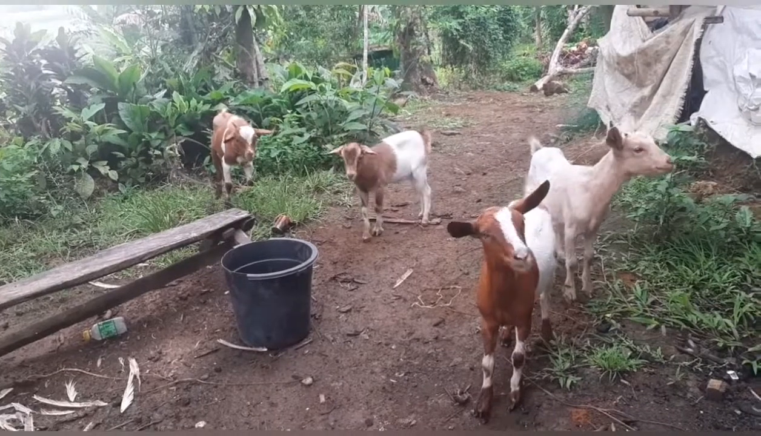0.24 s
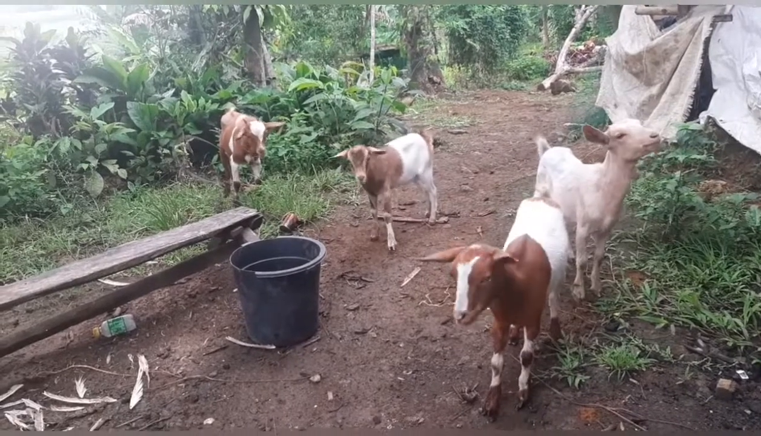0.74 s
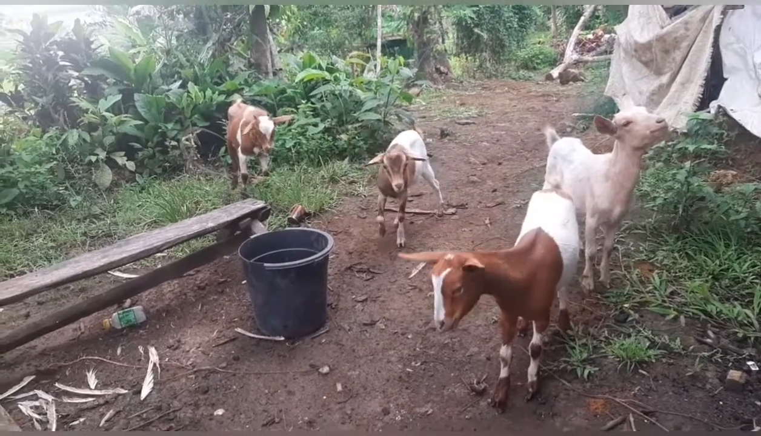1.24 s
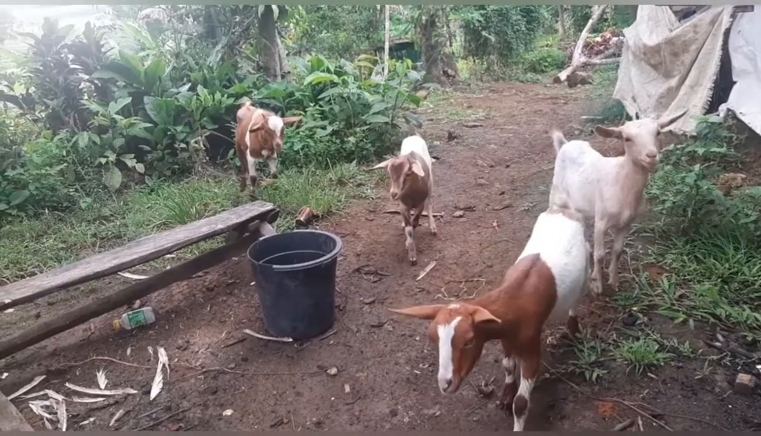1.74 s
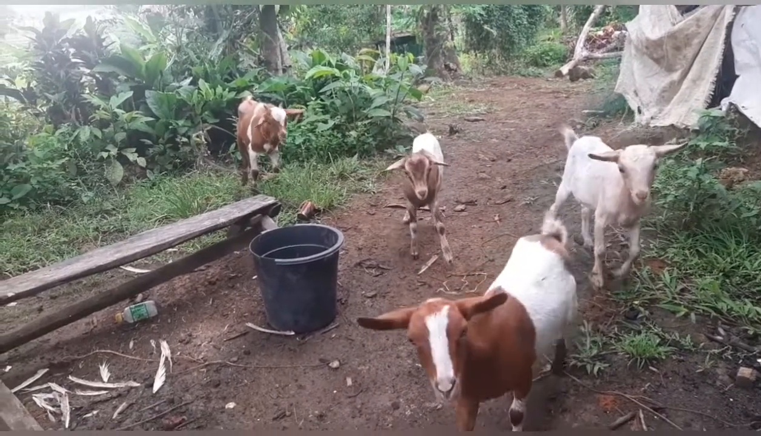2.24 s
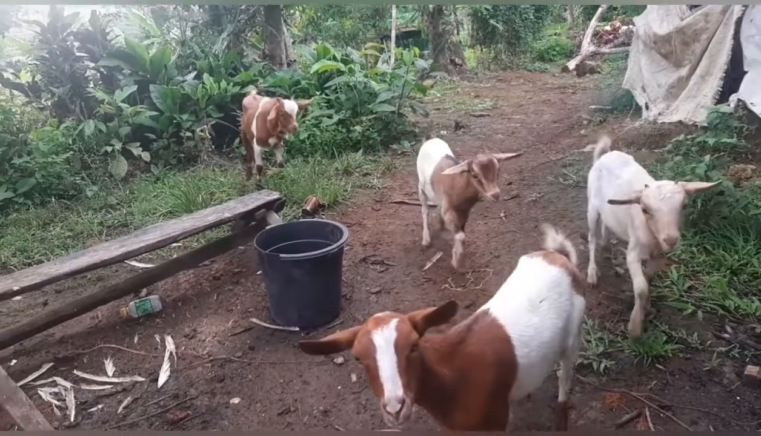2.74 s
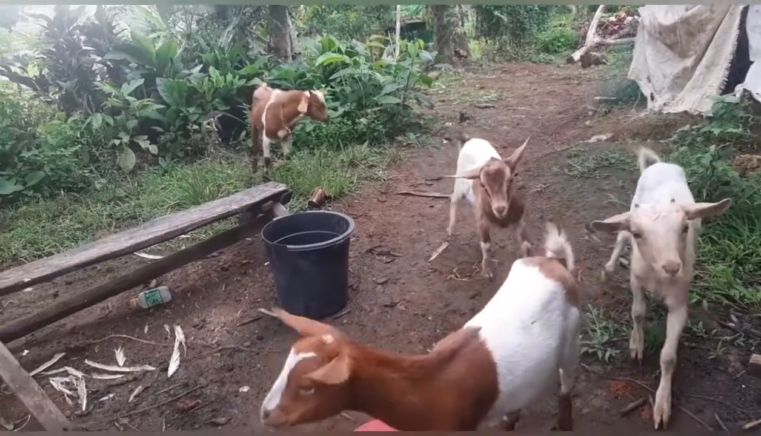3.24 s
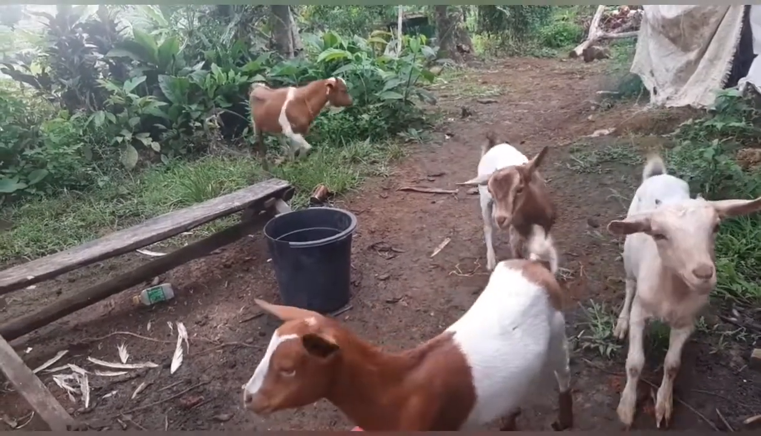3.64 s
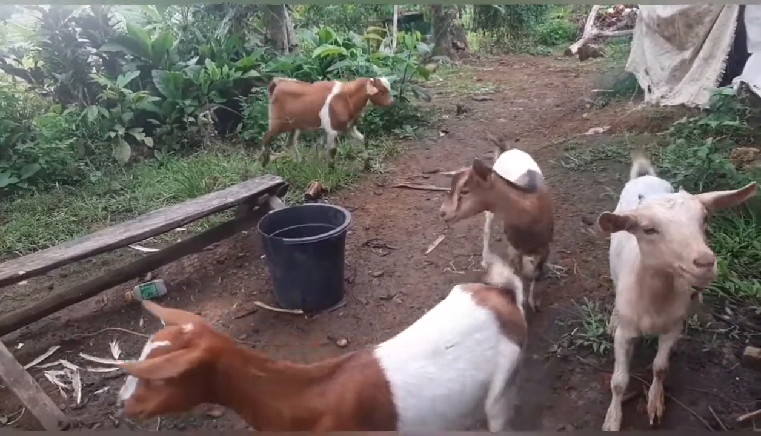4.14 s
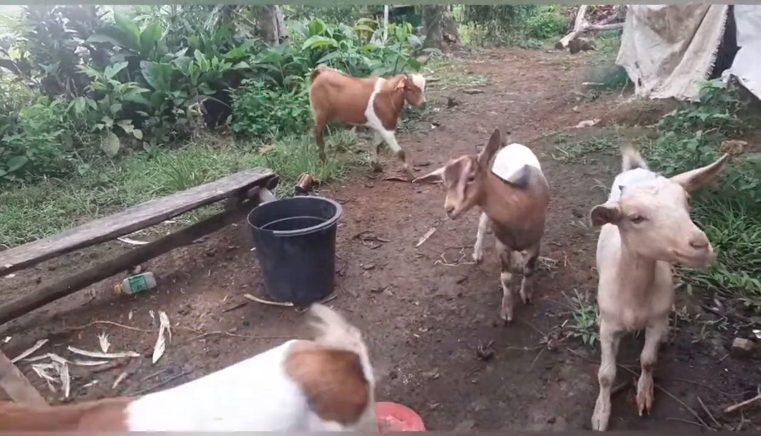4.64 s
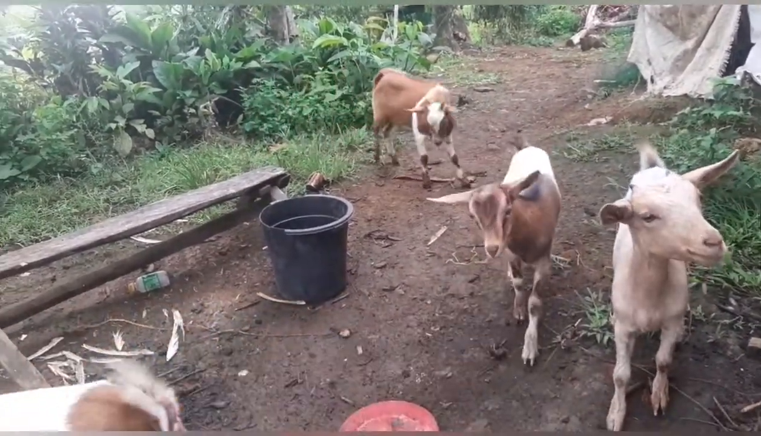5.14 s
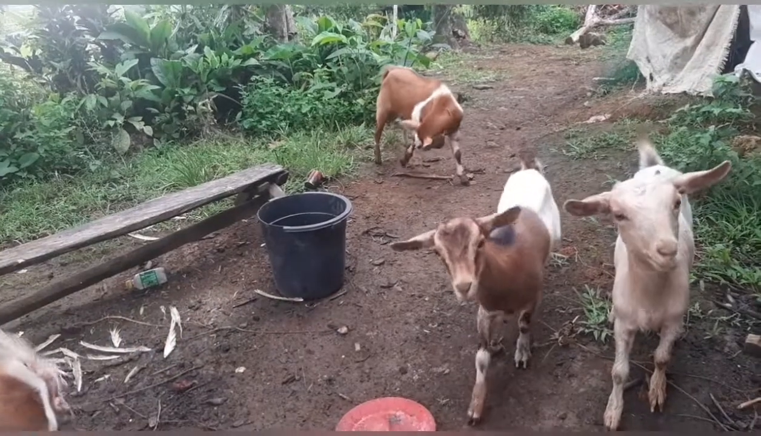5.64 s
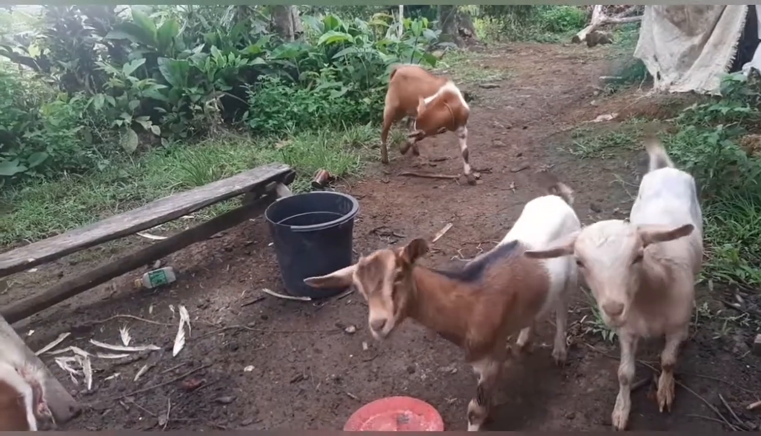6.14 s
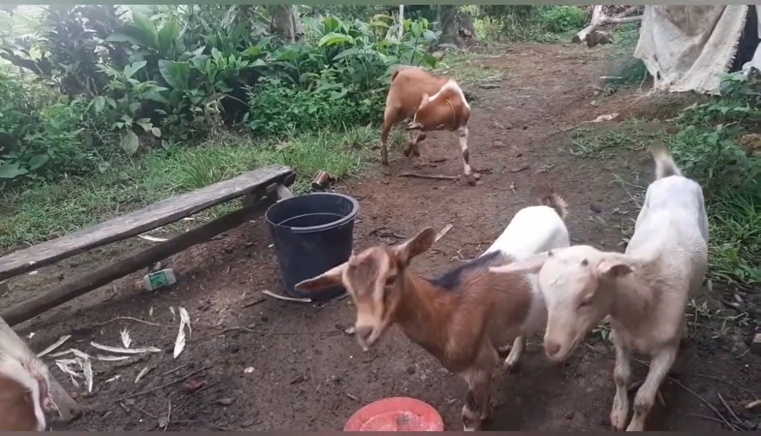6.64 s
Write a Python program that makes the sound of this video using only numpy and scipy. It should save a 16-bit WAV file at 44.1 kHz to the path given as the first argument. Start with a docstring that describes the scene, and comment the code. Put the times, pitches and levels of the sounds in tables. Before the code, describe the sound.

In a quiet dirt yard, one kid goat bleats nasally at the start, another hoarsely later, among light hoof scuffs, distant clucking and insect buzz.

```python
"""A dirt yard beside dense greenery, where goat kids wander. Two bleat in turn, close by: high, quavering
calls, nasal, then open, then hoarse, made of pitch harmonics and breath noise shaped by throat resonances.
Hoof steps are noise bursts (thud, scrape, grit); clucks, chirrs and far calls are gliding sine tones.
Filtered noise makes a faint insect hiss and buzz, a low rumble and a patchy background of narrow bands."""
import sys
import numpy as np
from scipy import signal
from scipy.fft import rfft, irfft, next_fast_len
from scipy.io import wavfile
from scipy.ndimage import uniform_filter1d

SR = 44100
rng = np.random.default_rng(int(sys.argv[2]) if len(sys.argv) > 2 else 0)


def generate_wav(sig):
    """Save sig (samples, or channels by samples) to the path in sys.argv[1] as 16-bit PCM at SR."""
    pcm = np.round(np.clip(np.atleast_2d(sig).T, -1, 1) * 32767).astype(np.int16)
    wavfile.write(sys.argv[1], SR, pcm)


N = 304102
TIME = np.arange(N) / SR
PADDED = next_fast_len(N + 2000, True)
FREQS = np.maximum(np.arange(PADDED // 2 + 1) * SR / PADDED, 1)
CUTOFF_HZ = 15600

# background level before each layer's trim: segments of rows [t/s, rumble level/dB, hiss level/dB]
YARD_AIR = [
    [(0.72, -60.5, -54), (1.1, -60.5, -56), (2.9, -65.5, -55.5), (3.33, -57.5, -55), (4.25, -65, -56)],
    [(5.05, -65, -58), (5.412, -66, -58.5), (5.562, -67, -59), (6.736, -59.5, -55.5), (6.89, -62.5, -56)],
]
# the yard at the two microphone ports: [f/Hz, left-right level/dB, likeness 0-1]
YARD_PATH = [(100, 5.5, 0.91), (344, -3.5, 1), (710, 4.5, 0), (1500, -5, 0), (2220, -11.5, 0.4),
             (3100, -1, 0), (5500, -5, 0.3), (6940, -2, 0), (9000, 1.5, 0.68), (15000, 0.5, 0)]
PORT_LAG_RAD = 2 * np.pi * FREQS * 0.0004794   # a path difference of 0.4794 ms


def from_db(db):
    """Logarithmic level: decibels to amplitude gain."""
    return 10 ** (np.asarray(db) / 20)


def rms_one(x):
    """Normalisation: scale to unit mean power."""
    return x / np.sqrt(np.mean(x ** 2) + 1e-20)


def in_time(rows, t):
    """Linear interpolation: each column of a curve at times t."""
    s, *columns = np.transpose(rows)
    return [np.interp(t, s, c) for c in columns]


def at_hz(rows, hz):
    """Interpolation on a log frequency axis: each column of a spectrum at the given frequencies."""
    f, *columns = np.transpose(rows)
    return [np.interp(np.log(hz), np.log(f), c) for c in columns]


def wander(rate_hz, size):
    """Low-passed noise: a smooth random modulation with unit rms."""
    sos = signal.butter(2, rate_hz, fs=SR / 10, output="sos")
    slow = signal.sosfilt(sos, rng.standard_normal(size // 10 + 2002))[2000:]   # skip the filter's start
    return np.interp(np.arange(size) / 10, np.arange(len(slow)), rms_one(slow))


def at_ports(spectrum, balance_db, lead_rad, apart=0):
    """Interaural-style cues: a spectrum to stereo by level and phase differences, total power kept."""
    ratio = from_db(balance_db)
    left = (spectrum + apart) * ratio
    right = (spectrum - apart) * np.exp(-1j * lead_rad)
    return irfft(np.array([left, right]) * np.sqrt(2 / (1 + ratio ** 2)), PADDED)[:, :N]


def from_yard(x):
    """Time difference of arrival: a small yard sound reaches the left port first."""
    return at_ports(rfft(x, PADDED), at_hz(YARD_PATH, FREQS)[0], PORT_LAG_RAD)


def yard_noise(spectrum):
    """Partial coherence: coloured stereo noise whose likeness at the ports depends on frequency; rms 1."""
    balance_db, alike = at_hz(YARD_PATH, FREQS)
    alike = np.clip(alike, 0, 1)
    common, apart = rfft(rng.standard_normal((2, PADDED))) * from_db(at_hz(spectrum, FREQS)[0])
    common, apart = common * np.sqrt(1 + alike), apart * np.sqrt(1 - alike)
    return rms_one(at_ports(common, balance_db, PORT_LAG_RAD, apart))


def first_kid():
    """Source and filter: the first kid's fold pushes and throat resonances."""
    # the arch beneath the throbs: [t/s, f/Hz, relative level/dB, mouth opening 0-1]
    arch = [(.135, 264.3, -50, 0.6), (.212, 299.5, -45, 0.22), (.238, 415, -43, 0.52),
            (.315, 445, -30.5, .29), (.378, 444.5, -30, 0.54), (.41, 457.7, -32, 0.03),
            (.475, 447, -25, 0.68), (.51, 447, -26.5, 0.63), (.565, 423.3, -26.5, 0.72),
            (.642, 336.8, -35, 0.68)]
    # throbs of the quaver: [t/s, rise/s, fall/s, level lift/dB, pitch lift/Hz]
    throbs = [(0.176, 0.023, 0.021, 9.5, 38.7), (0.278, 0.025, 0.017, 7.5, 5.2),
              (.362, 0.04, 0.021, 3.5, 17.8), (0.46, 0.01314, 0.0092, 4, 19),
              (0.556, 0.027, 0.0113, 10, 8.1)]
    # throat and mouth response: [f/Hz, closed level/dB, half open level/dB, wide open level/dB]
    throat = [(450, 7.5, -4, -25.5), (873, -7.5, -3.5, 13.5), (1390, -22, -3, -15.5), (1660, -19, -8, -25),
              (2210, -11, -2.5, 3.5), (2390, -13, -2.5, -42), (3150, -16, -6, -21), (3640, 11.5, -11, -6),
              (4220, -9, -0.5, -23.5), (4900, -13, -2, -25), (6200, -24, -23.5, -25.5),
              (8200, -23, -21, -40), (9800, -30, -31, -61), (13950, -42, -28.5, -38)]
    # path to the two ports: [f/Hz, left-right level/dB, left lead/rad]
    ports = [(450, 1.8, -0.52), (900, 4.5, 0.34), (1350, -8.3, 6.76), (1800, 0.7, 5.3), (2250, -8.7, 7.27),
             (2700, -5.2, 9.93), (3600, -4.5, 10.96), (4050, -4.2, 11.44), (4500, 2.9, 11.12),
             (4950, -6.5, 17.66), (5400, -5.4, 17.18), (7650, -2.2, 23.2), (12600, -5.8, 40.83)]
    return bleat(arch, throbs, throat, ports, gain_db=-1.5, tilt_db=-1.0, full_db=-31.5, dulling=0.3,
                 start_dull_db=5, throb_bright=0.04, jitter=0.026, rasp=0.39, rasp_hz=87,
                 breath_db=-30, uneven_db=4.5, jaw_hz=660, jaw_lift=0.92)


def second_kid():
    """Source and filter: the second kid has its own fold pushes and throat resonances."""
    # the arch beneath the throbs: [t/s, f/Hz, relative level/dB, mouth opening 0-1]
    arch = [(4.441, 280, -40.5, 0.67), (4.487, 379, -39, .02), (4.52, 438.6, -47.5, 0.17),
            (4.605, 460, -39.5, 0.057), (4.655, 486.6, -23.5, .23), (4.682, 477.6, -21, 1),
            (4.715, 482.6, -15, 0.9), (4.77, 472.8, -23, 0.6), (4.85, 462.3, -22.5, .55),
            (4.89, 433, -38.5, 0.6), (4.932, 368.3, -37.5, 0.18)]
    # throbs of the quaver: [t/s, rise/s, fall/s, level lift/dB, pitch lift/Hz]
    throbs = [(4.564, 0.024, 0.017, 17.6, 37), (4.661, 0.048, 0.012, 4.6, 13.8),
              (4.744, 0.0364, 0.0079, 7.5, 18.6), (4.827, 0.026, 0.015, 8.9, 29)]
    # throat and mouth response: [f/Hz, closed level/dB, half open level/dB, wide open level/dB]
    throat = [(467, 11, -17.5, -21), (1040, -10, -2, 5), (1460, -8.5, -4.5, -22.5), (2000, 5, -9, -17),
              (2325, -6.5, -5.5, -0.5), (2880, -26, -8, -18.5), (3500, -12, -18.5, -26.5),
              (3800, -4.5, -2.5, -12.5), (4950, -1, 1, -0.5), (5660, -20, -25.5, -26.5),
              (5810, -21.5, -16, -8), (8580, -25.5, -19.5, -24.5), (9600, -31, -32, -38),
              (14550, -29.5, -34, -35.5)]
    # path to the two ports: [f/Hz, left-right level/dB, left lead/rad]
    ports = [(487, 6.2, 0.48), (974, 2.1, 1.2), (1461, -6.2, 2.59), (1948, -6.5, 3.52), (2435, -4.1, 5.94),
             (2922, 5.6, 9.65), (3896, 2.4, 13.56), (4383, 1.2, 14.85), (4870, -6.1, 16.67),
             (5357, -2.6, 17.6), (5844, -3.0, 19.03), (8279, 3.9, 25.27), (13636, -2.1, 44.67)]
    return bleat(arch, throbs, throat, ports, gain_db=-0.06, tilt_db=0.1, full_db=-34, dulling=0.12,
                 start_dull_db=0.5, throb_bright=0.044, jitter=0.022, rasp=0.76, rasp_hz=100,
                 breath_db=-29, uneven_db=4.0, jaw_hz=655, jaw_lift=10.0)


def bleat(arch, throbs, throat, ports, gain_db, tilt_db, full_db, dulling, start_dull_db, throb_bright,
          jitter, rasp, rasp_hz, breath_db, uneven_db, jaw_hz, jaw_lift):
    """Source-filter voice: folds pushed in throbs give harmonics and breath through an opening throat."""
    attack_s, release_s, edge_db = .012, .025, 31   # the voice swells and dies by edge_db in these times
    start, end = arch[0][0], arch[-1][0]
    span = (TIME >= start - attack_s) & (TIME <= end + release_s)
    t = TIME[span]
    pitch, level_db, mouth = in_time(arch, t)
    mouth = np.clip(mouth, 0, 1)
    outside = np.maximum(start - t, 0) / attack_s + np.maximum(t - end, 0) / release_s
    level_db = level_db - edge_db * outside
    rough = roughness(t, throbs)

    push_db = 0
    for s, rise, fall, lift_db, lift_hz in throbs:   # each push makes the voice louder, higher and brighter
        push = np.exp(-((t - s) / np.where(t < s, rise, fall)) ** 2)
        push_db = push_db + lift_db * push
        pitch = pitch + lift_hz * push
    level_db = level_db + push_db
    weak_db = np.maximum(full_db - level_db, 0)
    pitch = uniform_filter1d(pitch, size=200) * (1 + jitter * rough * wander(110, len(t)))
    phase = 2 * np.pi * np.cumsum(pitch) / SR

    # spectral slope in dB per octave: weak effort is dull, and so is the opening grunt
    slope_db = tilt_db + throb_bright * push_db - dulling * weak_db
    slope_db = slope_db - start_dull_db * np.exp(-((t - t[0]) / .1) ** 2)

    voice, power = 0, 0
    for k in range(1, 41):
        hz = k * pitch
        closed_db, half_db, open_db = at_hz(throat, hz)
        extreme_db = np.where(mouth < .5, closed_db, open_db)
        colour_db = half_db + np.abs(2 * mouth - 1) * (extreme_db - half_db)
        colour_db += slope_db * np.log2(np.clip(hz, 700, 7000) / 1000)
        # a slack jaw lowers the first resonance: weak, open sound gains near jaw_hz
        colour_db += jaw_lift * np.minimum(weak_db, 10) * mouth * np.exp(-((hz - jaw_hz) / 170) ** 2)
        colour_db += uneven_db * min(k / 6, 1) * wander(13.8, len(t))
        gain = from_db(colour_db) * (hz < CUTOFF_HZ)
        scatter = rasp * rough * (hz / 2000) ** 0.95   # upper harmonics blur first
        flutter = (wander(rasp_hz, len(t)) + 1j * wander(rasp_hz, len(t))) * scatter
        ringing = np.exp(-1j * 2.2 * np.sqrt(hz / 100))   # the throat smears each pulse, lows last
        harmonic = np.real((1 + flutter) * ringing * np.exp(1j * k * phase))
        voice = voice + gain * harmonic / np.sqrt(1 + 2 * scatter ** 2)
        power = power + gain ** 2 / 2

    swell = from_db(level_db + gain_db)
    folds, air = np.zeros((2, N))
    folds[span] = swell * voice / np.sqrt(power)
    puffs = 1 + np.cos(phase)   # one puff of air per cycle
    air[span] = swell * np.sqrt(rough) * puffs * rng.standard_normal(len(t))
    air_colour = rms_one(from_db(at_hz(throat, FREQS)[1]) * FREQS / (FREQS + 2500))
    growl = from_db(20) * np.exp(-((FREQS - 280) / 130) ** 2)   # rough folds also flutter below the pitch
    breath = from_db(breath_db) * rfft(air, PADDED) * (air_colour + growl)
    return at_ports(rfft(folds, PADDED) + breath, *at_hz(ports, FREQS))


def roughness(t, throbs):
    """Irregular fold vibration, 0-1: unsteady at the start, rattling after each push, hoarse at the end."""
    clear, onset, onset_s = 0.019, 0.55, .1   # the folds take a while to settle
    rattle, rattle_lag = .25, 1.55   # they rattle this many fall times after a push's peak
    hoarse, hoarse_s = 0.69, 0.049   # and turn hoarse after the last push
    rough = clear + onset * np.exp(-(t - t[0]) / onset_s)
    for s, _, fall, _, _ in throbs:
        rough = rough + rattle * np.exp(-((t - s) / fall - rattle_lag) ** 2)
    since_last = np.maximum(t - throbs[-1][0], 0)
    return np.clip(rough + hoarse * (1 - np.exp(-since_last / hoarse_s)), 0, 1)


def hollow(x):
    """Sympathetic resonance: something hollow in the yard sings on after the voice has swept through."""
    # its modes: [f/Hz, decay time to -60 dB/s, level/dB]
    modes = [(856, .8, -13), (1000, .6, -37.5)]
    out = 0
    for hz, t60, level_db in modes:
        r = 10 ** (-3 / (t60 * SR))   # pole radius
        zeros = [(1 - r * r) / 2, 0, (r * r - 1) / 2]
        poles = [1, -2 * r * np.cos(2 * np.pi * hz / SR), r * r]
        out = out + from_db(level_db) * signal.lfilter(zeros, poles, x)
    return out


def yard_echo(x, wet_db, t60, gap_s):
    """Diffuse scattering: walls, ground and leaves return a short, thin, exponentially decaying tail."""
    t = TIME[:SR // 2]
    tail = rng.standard_normal((2, len(t))) * from_db(-60 * t / t60) * (t > gap_s)
    tail = signal.sosfilt(signal.butter(1, [500, 7000], "band", fs=SR, output="sos"), tail)
    tail = tail / np.sqrt(np.sum(tail ** 2) / 2)
    return from_db(wet_db) * signal.fftconvolve(x, tail, axes=1)[:, :N]


def hooves(thud_db, scrape_db, grit_db, attack_s, grain_db, width):
    """Impact and friction noise: each step is a dull thud, a grainy pitched scrape and a spray of grit."""
    # thud spectrum: [f/Hz, relative level/dB]
    thud_spectrum = [(30, -38), (80, -35), (160, 7), (230, -18), (310, 12.5), (400, -27), (600, -17.5),
                     (1500, -39.5)]
    # grit spectrum: [f/Hz, relative level/dB]
    grit_spectrum = [(1500, -49), (3000, 1), (3900, 1), (4800, 8.5), (5600, -8), (6500, -34), (8000, -1.5),
                     (15000, -31)]
    thud, grit, scrape = np.zeros((3, N))
    for s, spray_db, weight_db, rub_db, hz in footfalls():
        length = 0.046 * 2 ** ((weight_db + 48) / 15.5)   # seconds; heavier steps last longer
        at = slice(int(s * SR), int(s * SR) + SR // 3)
        age = np.maximum(TIME[at] - s, 0)
        press = (1 - np.exp(-age / attack_s)) * np.exp(-(age / length) ** 2.17)
        grains = press * rms_one(from_db(grain_db * wander(176, len(age))))
        band = signal.butter(1, [hz / (1 + width), hz * (1 + width)], "band", fs=SR, output="sos")
        rub = signal.sosfilt(band, grains * rng.standard_normal(len(age)))
        scrape[at] += from_db(rub_db) * rub * np.sqrt(SR / (2 * np.pi * width * hz))   # offsets band loss
        thud[at] += from_db(weight_db) * press
        grit[at] += from_db(spray_db) * grains
    thuds = from_db(thud_db) * thud * yard_noise(thud_spectrum)
    scrapes = from_db(scrape_db) * from_yard(scrape)
    return thuds + scrapes + from_db(grit_db) * grit * yard_noise(grit_spectrum)


def footfalls():
    """Random event process: light shuffles at chance times join the clear steps, in rows like theirs."""
    # the clear steps, levels before trim: [t/s, grit level/dB, thud level/dB, scrape level/dB, scrape f/Hz]
    steps = [(1.0675, -40, -44, -60, 2360), (1.1854, -41, -56, -71, 2480), (1.2794, -62, -50, -48, 1500),
             (1.5194, -51, -43.5, -54, 1610), (1.6157, -44.5, -46.5, -54.5, 2270),
             (1.8844, -51, -40, -52, 1540), (2.0448, -46.5, -48, -46, 1100),
             (2.3884, -47, -49.5, -58, 2420), (2.4304, -47, -48.5, -48, 1530),
             (2.804, -40.5, -61.5, -56, 1610), (2.9472, -46, -46, -62, 2310),
             (3.0994, -40.5, -59, -52.5, 1580), (3.1864, -48, -53.5, -56.5, 2350),
             (3.2894, -45, -50.5, -58, 2370), (4.2584, -56, -50.5, -52.5, 2360),
             (4.3804, -44, -48, -52, 2300), (5.7044, -62, -56, -49, 2160),
             (5.8496, -40.5, -58.5, -48.5, 2380), (6.1789, -40.5, -57.5, -65, 2420),
             (6.3494, -45, -47, -61, 2240), (6.546, -53, -46, -79, 2270), (6.6394, -45, -55, -49, 1830),
             (6.7994, -59, -56, -50, 1300)]
    per_s, spread_db = 6, 0.5
    grit_db, thud_db, scrape_db = -49, -59.5, -58
    low_hz, high_hz = 780, 2473   # range of the scrape
    rows = list(steps)
    for when, force, pitch in rng.random((int(per_s * N / SR), 3)):
        db = spread_db * (2 * force - 1)
        hz = low_hz * (high_hz / low_hz) ** pitch
        rows.append((when * TIME[-SR // 20], grit_db + db, thud_db + db, scrape_db + db, hz))
    return rows


def clucks(gain_db, length_s, fall, hoarse):
    """Frequency-modulated tone bursts: brief hoarse notes that sag in pitch."""
    # soft distant clucks: [t/s, peak level before gain/dB, f/Hz]
    clear_clucks = [(0.784, -47.5, 860), (0.958, -47.5, 852), (1.25, -44.5, 870), (3.182, -54.5, 770),
                    (3.374, -49.5, 697), (4.012, -53.5, 840), (4.225, -48, 872), (4.385, -50, 778),
                    (6.205, -46, 854), (6.346, -46, 775), (6.514, -46.5, 835), (6.686, -49, 845)]
    out = np.zeros(N)
    for s, level_db, hz in list(clear_clucks) + faint_clucks():
        near = np.abs(TIME - s) < .08
        age = TIME[near] - s
        pitch = hz * (1 - fall * age + hoarse * wander(126, len(age)))
        swell = np.exp(-(age / np.where(age < 0, .007, length_s)) ** 2)
        out[near] += from_db(level_db + gain_db) * swell * np.sin(2 * np.pi * np.cumsum(pitch) / SR)
    return from_yard(out)


def faint_clucks():
    """Random event process: fainter clucks at chance times, in rows like those of the clear ones."""
    per_s, mean_db, spread_db = 5.5, -59.5, 4.5   # levels before the gain
    low_hz, high_hz = 650, 993
    return [(when * TIME[-1], mean_db + spread_db * (2 * force - 1), low_hz + (high_hz - low_hz) * pitch)
            for when, force, pitch in rng.random((int(per_s * N / SR), 3))]


def chirrs(warble, warble_hz):
    """Random frequency modulation: thin high notes in the greenery warble unevenly, swell and fade."""
    # faint chirrs: [middle t/s, half length/s, f/Hz, level/dB]
    chirr_rows = [(1.775, 0.08, 5200, -49), (2.195, .09, 5230, -51), (2.492, 0.11, 4150, -56),
                  (3.352, 0.021, 4170, -52), (3.97, 0.015, 5660, -42)]
    bend = np.cumsum(1 + warble * wander(warble_hz, N)) / SR
    out = np.zeros(N)
    for s, half_length, hz, level_db in chirr_rows:
        swell = np.exp(-np.minimum(((TIME - s) / half_length) ** 2, 20))
        out += from_db(level_db) * swell * np.sin(2 * np.pi * hz * bend)
    return from_yard(out)


def far_calls(rough, flicker_db):
    """Loss of overtones with distance: held quavering notes keep only their lowest two harmonics."""
    # far calls: [t/s, length/s, f/Hz, level/dB, quaver as a share of f, second harmonic level/dB]
    calls = [(.58, .39, 872.5, -49.5, .003, -18), (3.255, .53, 513, -55.5, .04, -3)]
    quaver_hz, throb_db = 7.2, 1.2   # they swell with each quaver
    out = np.zeros(N)
    for s, length, hz, level_db, quaver, overtone_db in calls:
        span = (TIME > s) & (TIME < s + length)
        throb = np.sin(2 * np.pi * quaver_hz * (TIME[span] - s))
        pitch = hz * (1 + quaver * (rough * wander(130, N)[span] - throb))
        phase = 2 * np.pi * np.cumsum(pitch) / SR
        swell = from_db(level_db + throb_db * throb + flicker_db * wander(30, N)[span])
        swell = swell * signal.windows.tukey(span.sum(), .4)
        out[span] += swell * (np.sin(phase) + from_db(overtone_db) * np.sin(2 * phase))
    return from_yard(out)


def buzz():
    """Amplitude-modulated narrow-band noise: insect buzz swells and sinks."""
    centre_hz, width_hz = 5050, 730
    trim_db, swing_db, swell_hz = -4, 6, 6   # trim relative to the hiss curve
    edges = [centre_hz - width_hz / 2, centre_hz + width_hz / 2]
    band = signal.butter(2, edges, "band", fs=SR, output="sos")
    hiss_curve_db = in_time(np.concatenate(YARD_AIR), TIME)[1]
    swell = from_db(hiss_curve_db + trim_db + swing_db * np.tanh(wander(swell_hz, N)))
    return from_yard(swell * rms_one(signal.sosfilt(band, rng.standard_normal(N))))


def background(rumble_db, hiss_db, patch_db, lumpy_db):
    """Superposed noise bands: an uneven low rumble, a slowly varying high hiss and faint patchy noise."""
    # rumble spectrum: [f/Hz, relative level/dB]
    rumble_spectrum = [(20, -21), (35, -14.5), (50, -5.5), (90, -3), (160, 1), (300, 2.5), (420, -18),
                       (800, -10), (1600, -17), (3000, -33), (6000, -59)]
    # hiss spectrum: [f/Hz, relative level/dB]
    hiss_spectrum = [(1500, -55), (2400, -5), (3100, -12), (3800, -2), (4300, -7.5), (5100, 5.5),
                     (5700, -1), (6500, -8.5), (7550, 6), (8400, -7), (9300, -5), (10400, -4),
                     (11800, -8.5), (15500, -10.5)]
    low_db, high_db = in_time(np.concatenate(YARD_AIR), TIME)
    rumble = from_db(low_db + rumble_db + lumpy_db * wander(8.0, N)) * yard_noise(rumble_spectrum)
    hiss = from_db(hiss_db) * yard_noise(hiss_spectrum)
    patches = from_db(patch_db) * patchy_noise(swing_db=11.5)
    return rumble + from_db(high_db) * (hiss + patches)


def patchy_noise(swing_db):
    """Independent band modulation: narrow bands of faint noise swell and sink independently."""
    # mean spectrum of the patches: [f/Hz, relative level/dB]
    patch_spectrum = [(600, -25), (900, 10), (1200, -2.5), (1600, 4), (2000, -6.5), (2350, 14), (3000, -16),
                      (4000, -1), (5100, 6), (6000, -24)]
    edges = np.geomspace(600, 6000, num=13)
    white = rng.standard_normal((2, N))
    out = 0
    for k, (low, high) in enumerate(zip(edges, edges[1:])):
        sos = signal.butter(2, [low, high], "band", fs=SR, output="sos")
        band = signal.sosfilt(sos, white[k % 2])
        colour_db = at_hz(patch_spectrum, np.sqrt(low * high))[0]
        out = out + band * from_db(colour_db + swing_db * np.tanh(wander(11.7, N)))
    return from_yard(rms_one(out))


def scene():
    """Superposition: two bleats and their echoes over the small sounds of the yard."""
    kids = first_kid() + second_kid()
    echoes = hollow(kids) + yard_echo(kids, wet_db=-12, t60=0.22, gap_s=0.0032)
    steps = hooves(thud_db=-2, scrape_db=-0.5, grit_db=-9, attack_s=0.0017, grain_db=3.5, width=0.058)
    small_calls = clucks(gain_db=7, length_s=0.02, fall=2.69, hoarse=0.055)
    small_calls = small_calls + chirrs(warble=0.0253, warble_hz=254)
    far = far_calls(rough=1.06, flicker_db=1.5)
    air = background(rumble_db=3.0, hiss_db=3.0, patch_db=-4.0, lumpy_db=4.0)
    return kids + echoes + steps + small_calls + far + buzz() + air


def record(dry):
    """Soft saturation and band limiting: the highest peaks are rounded and the top is cut steeply."""
    ceiling = .93   # share of full scale
    rounded = dry / (1 + (dry / ceiling) ** 6) ** (1 / 6)
    return signal.sosfilt(signal.ellip(10, .1, 80, CUTOFF_HZ, fs=SR, output="sos"), rounded)


dry = scene()
out = record(dry)
generate_wav(out)
```